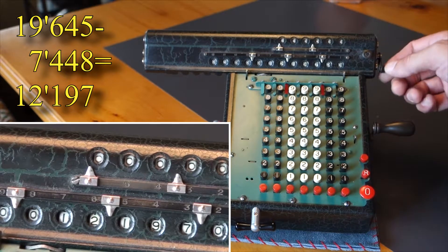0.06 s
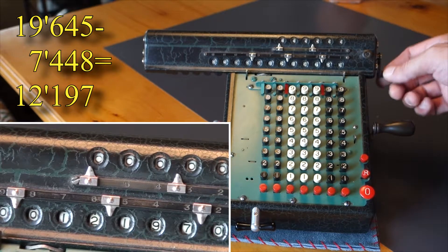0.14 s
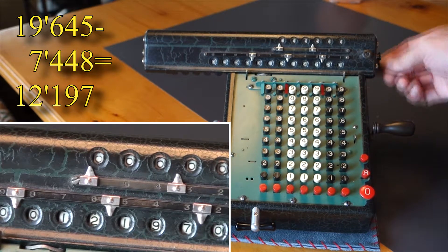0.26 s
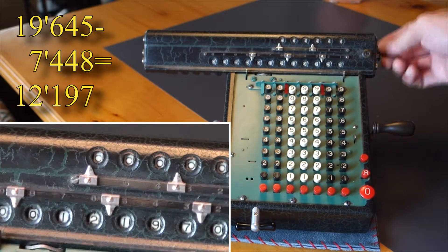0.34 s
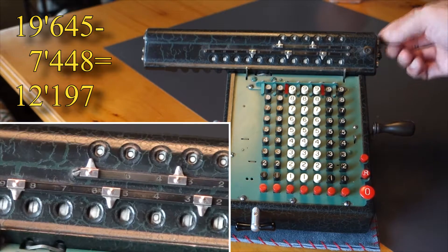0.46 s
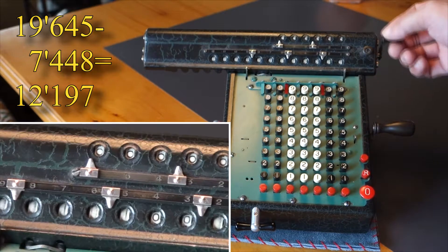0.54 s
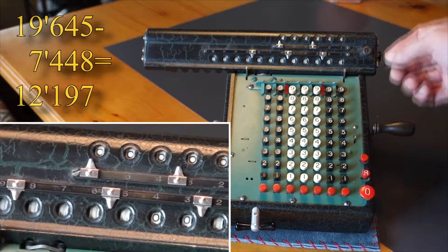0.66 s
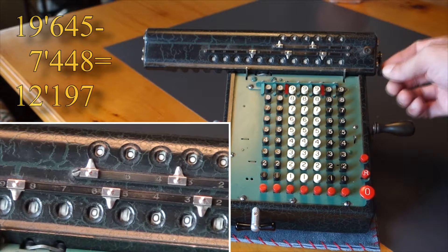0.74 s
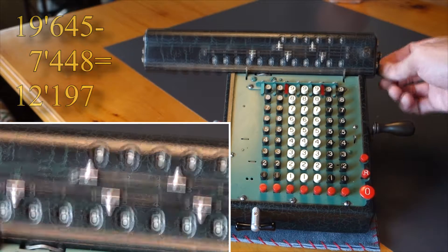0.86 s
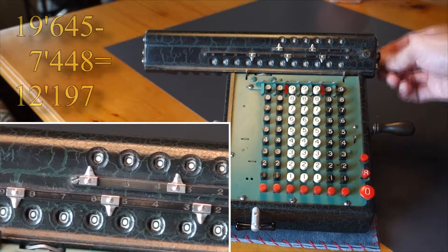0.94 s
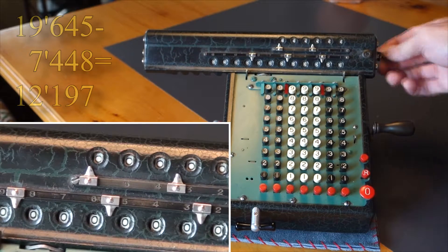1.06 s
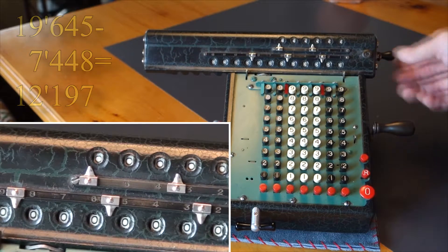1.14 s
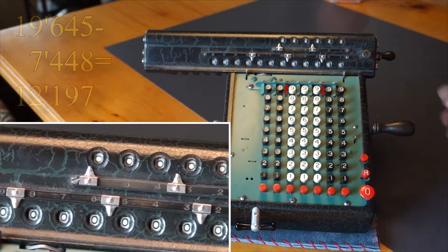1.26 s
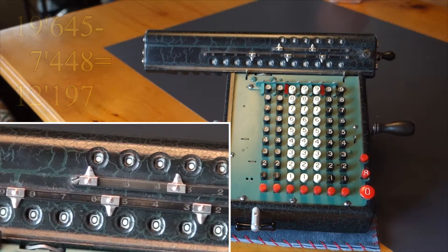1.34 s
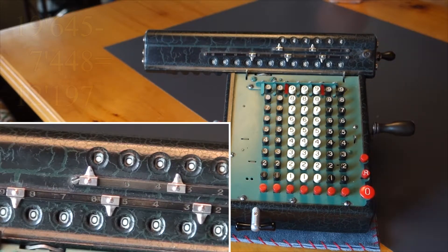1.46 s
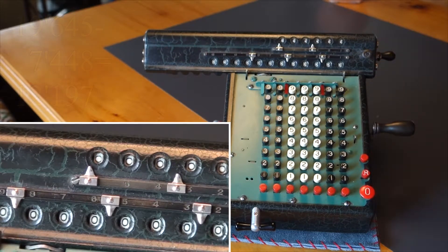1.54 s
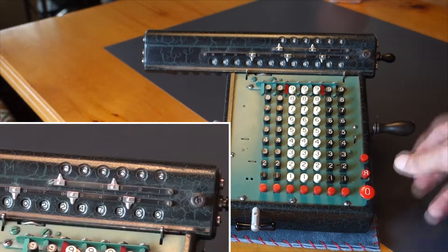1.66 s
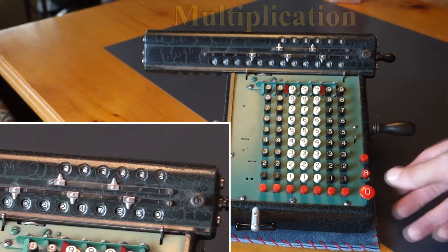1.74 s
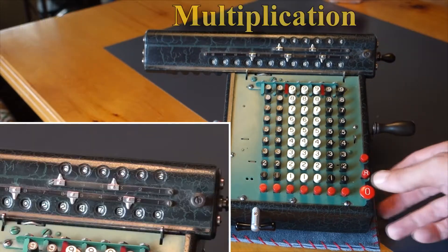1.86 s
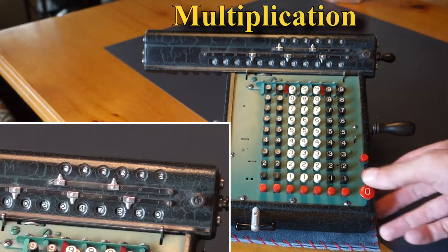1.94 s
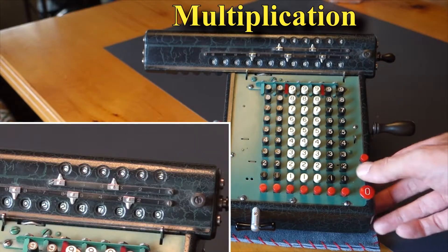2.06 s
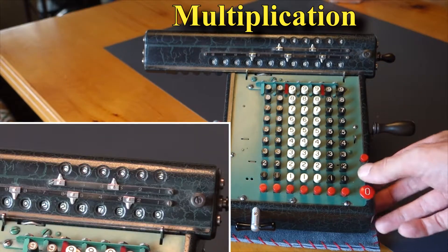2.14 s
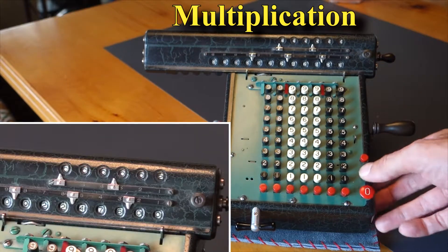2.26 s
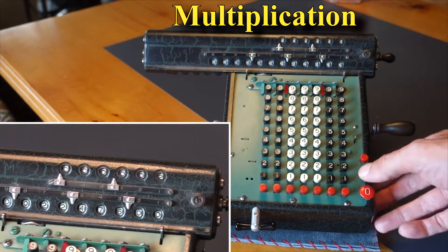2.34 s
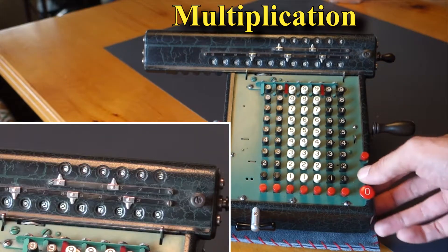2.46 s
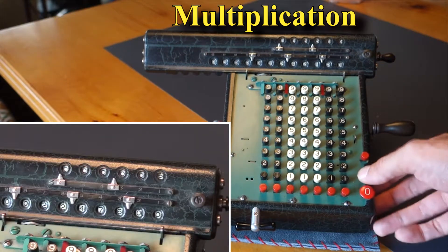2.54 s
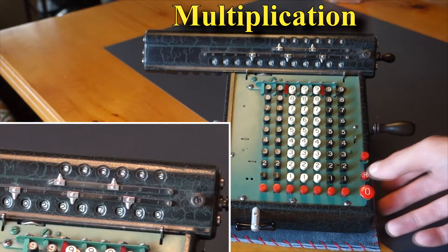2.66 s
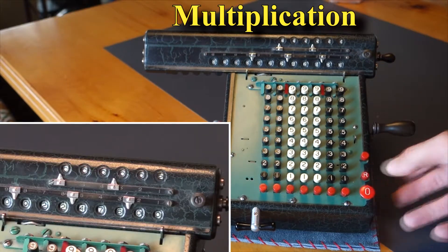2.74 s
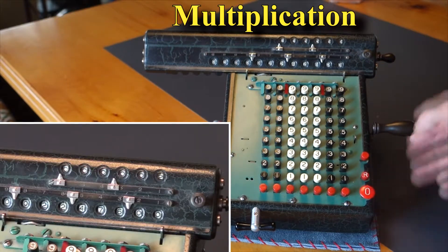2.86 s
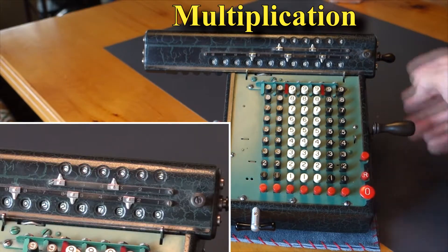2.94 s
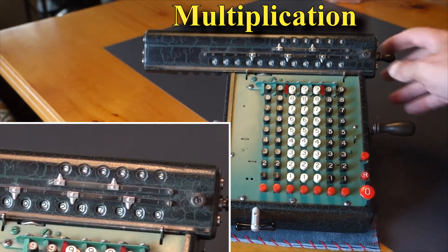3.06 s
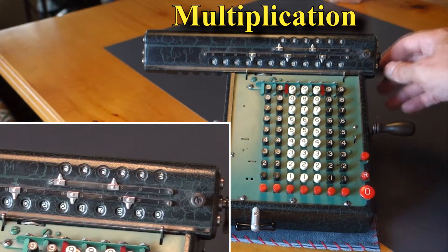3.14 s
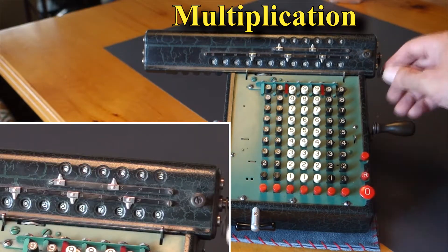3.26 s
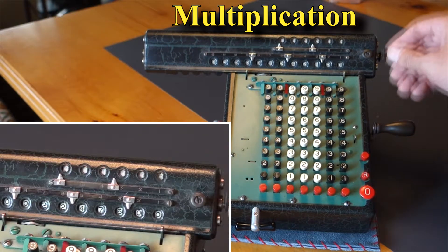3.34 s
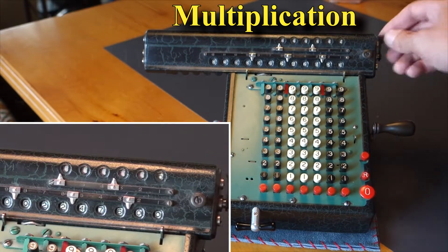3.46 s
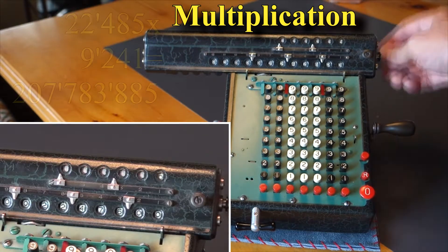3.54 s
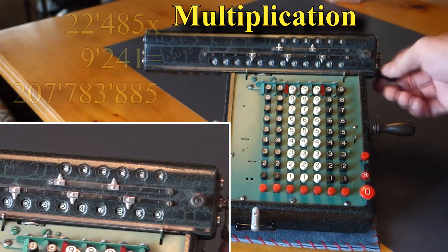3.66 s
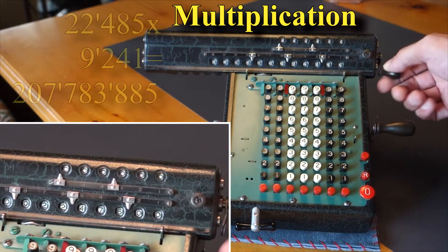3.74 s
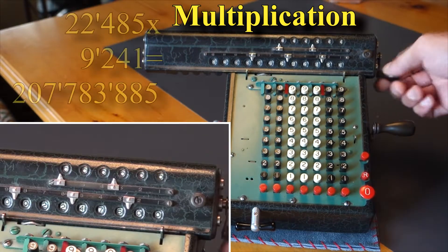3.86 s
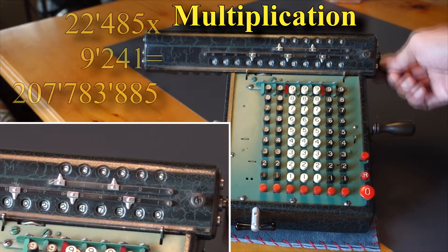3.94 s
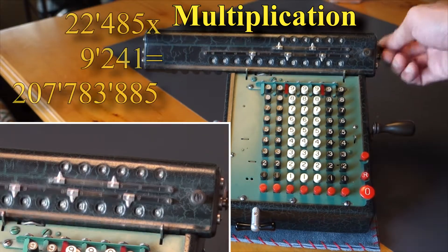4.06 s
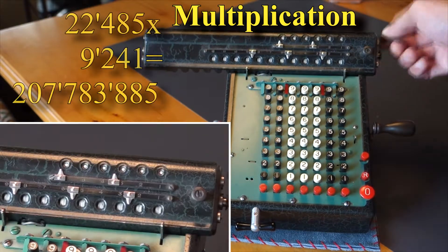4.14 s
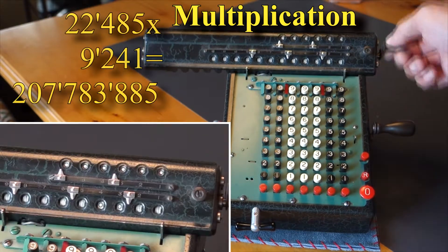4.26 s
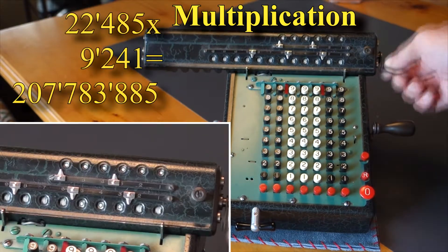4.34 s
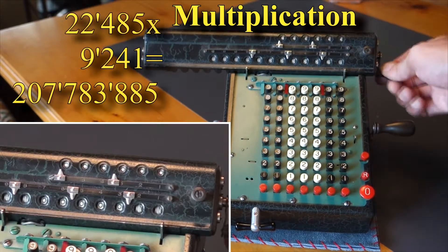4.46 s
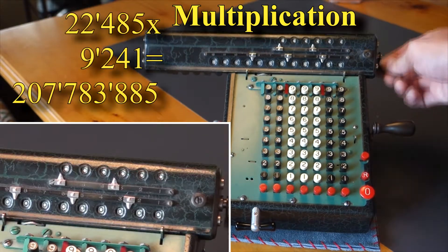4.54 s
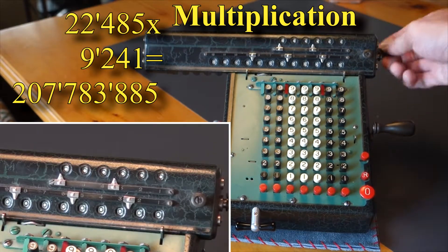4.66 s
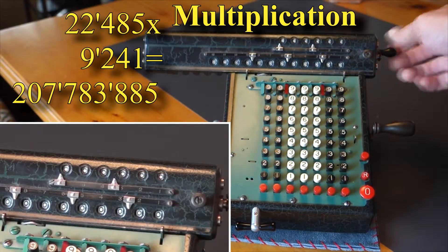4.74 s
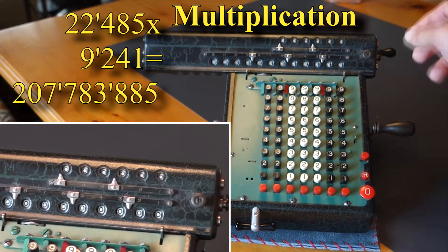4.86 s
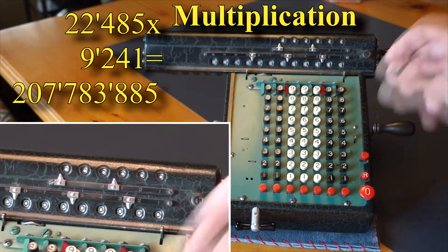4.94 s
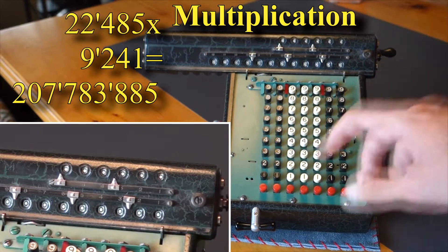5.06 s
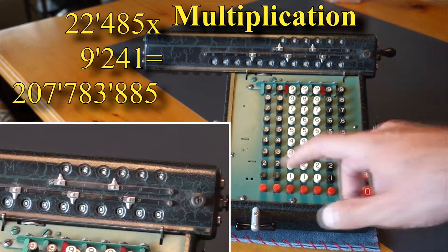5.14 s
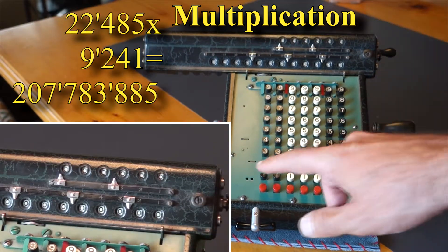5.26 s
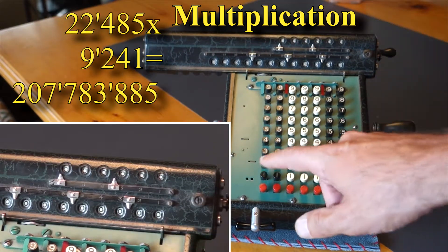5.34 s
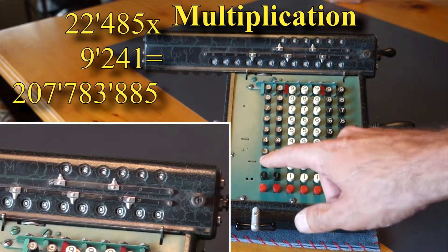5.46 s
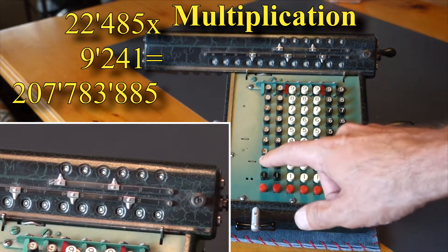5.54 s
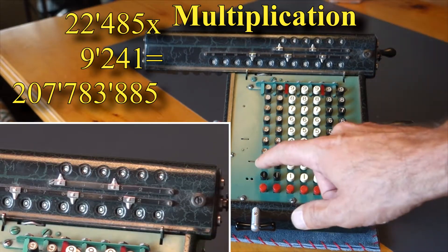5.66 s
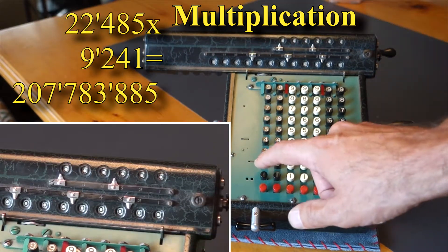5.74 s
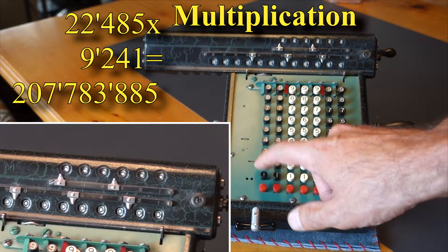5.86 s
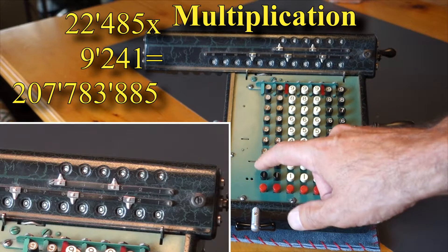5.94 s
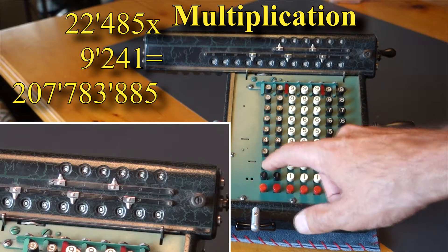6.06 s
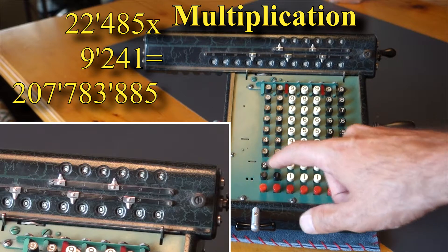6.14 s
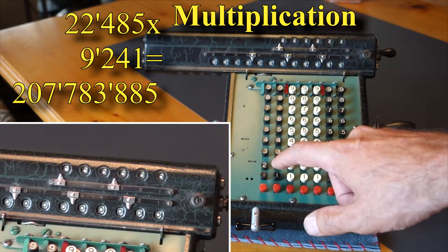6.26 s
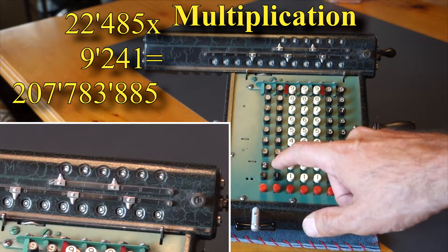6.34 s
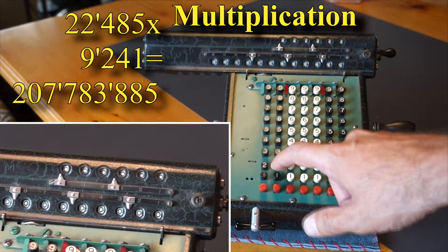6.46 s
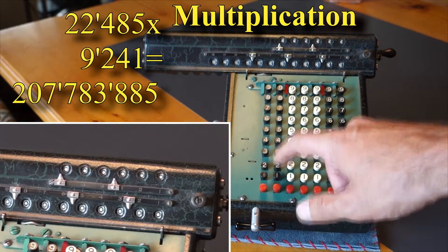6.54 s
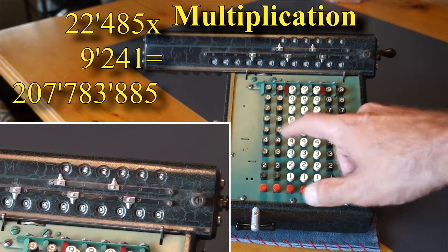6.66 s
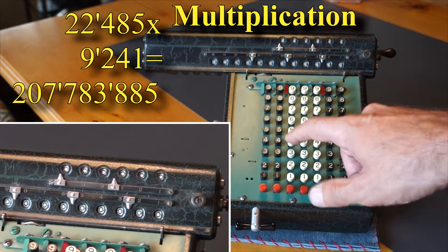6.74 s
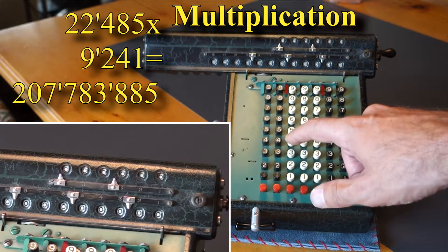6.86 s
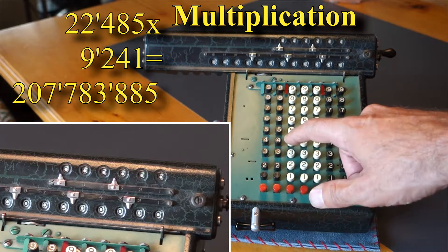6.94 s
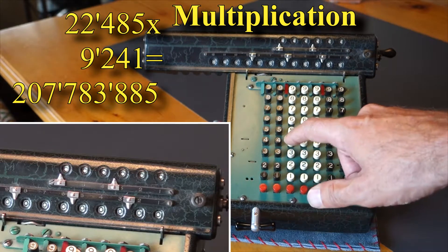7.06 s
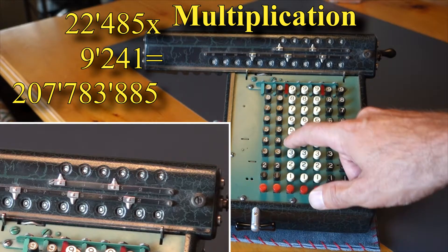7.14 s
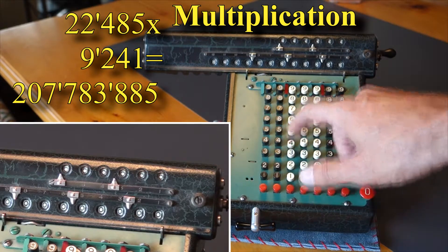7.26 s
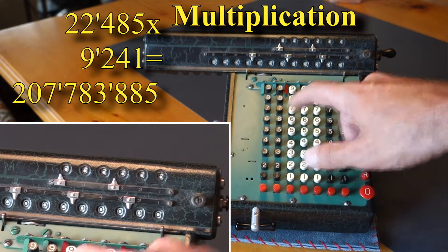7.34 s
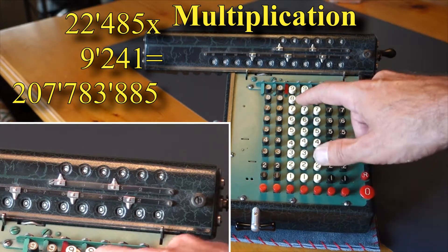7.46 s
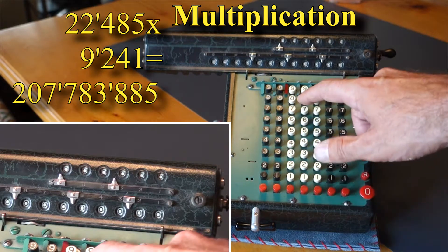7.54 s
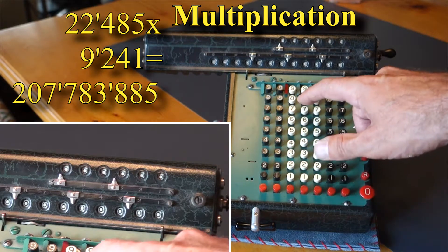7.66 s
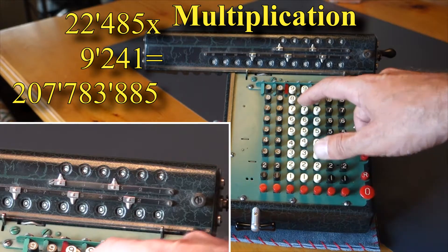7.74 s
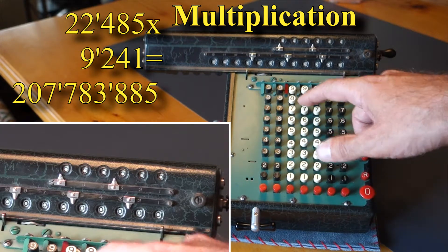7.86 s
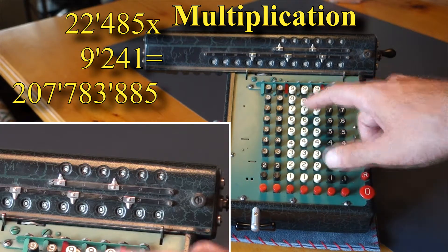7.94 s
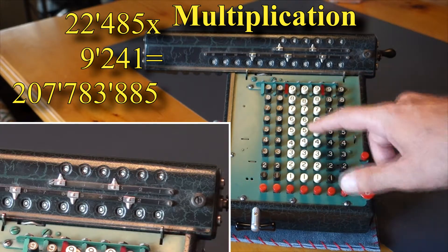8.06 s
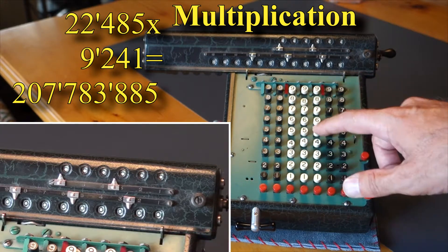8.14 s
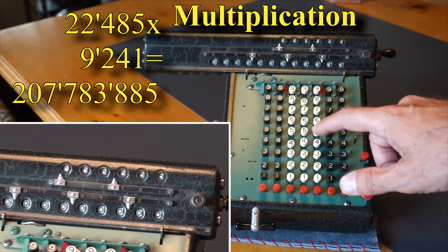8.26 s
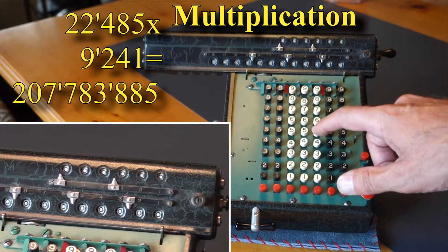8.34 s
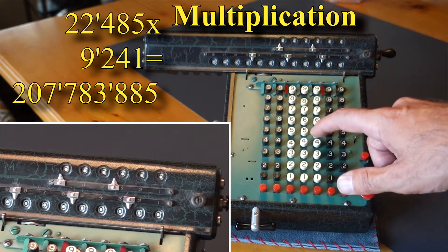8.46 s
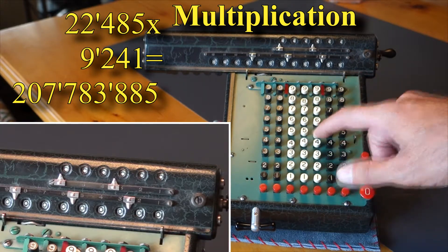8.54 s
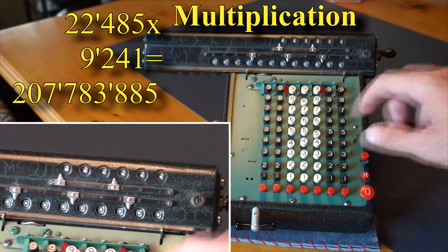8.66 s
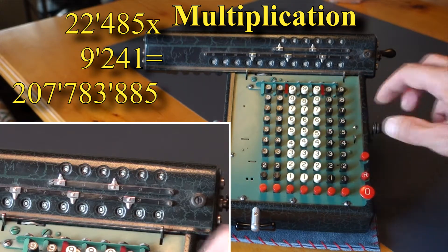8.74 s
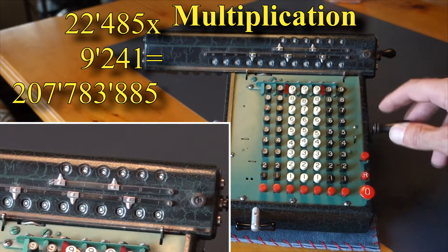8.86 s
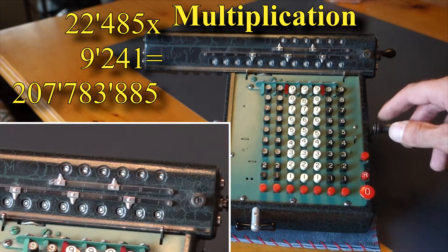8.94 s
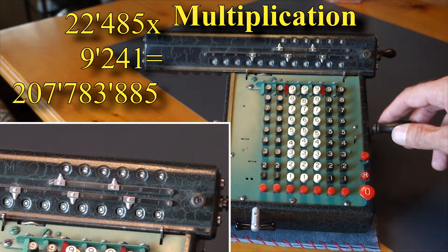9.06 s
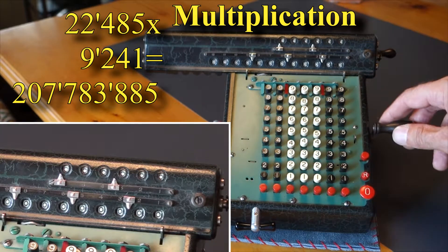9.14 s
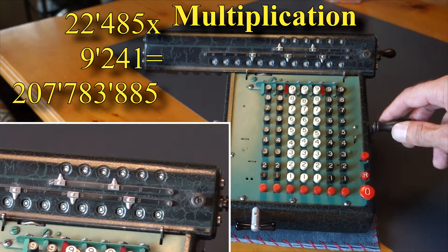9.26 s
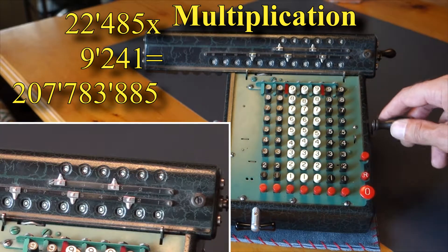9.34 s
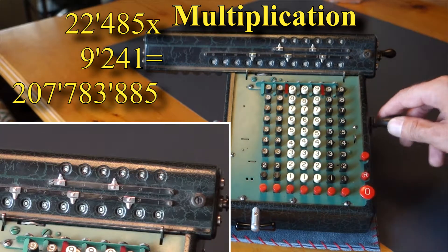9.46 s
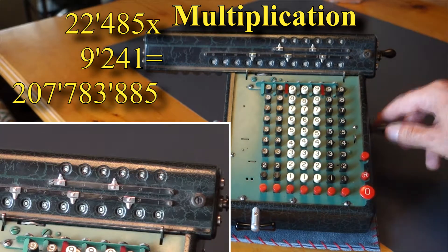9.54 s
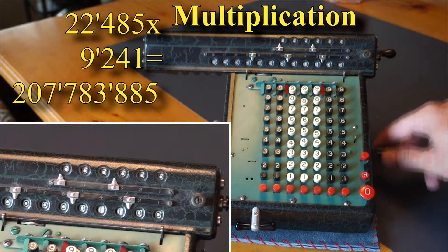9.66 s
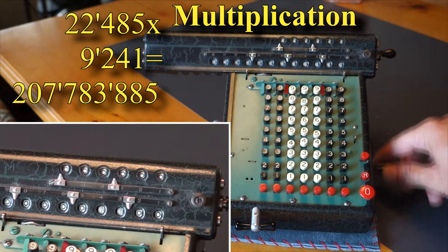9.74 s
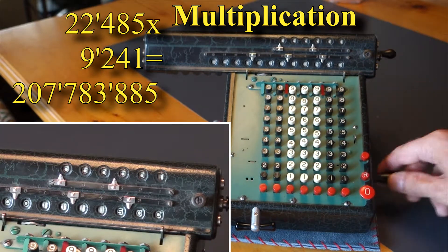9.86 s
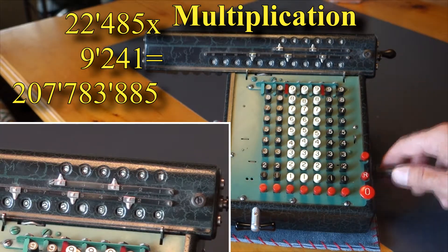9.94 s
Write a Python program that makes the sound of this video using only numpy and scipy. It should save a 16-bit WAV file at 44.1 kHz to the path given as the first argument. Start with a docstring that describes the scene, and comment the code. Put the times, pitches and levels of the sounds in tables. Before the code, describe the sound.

A quiet furnished room with soft air noise, microphone hiss, a barely audible low hum and a very thin high whine. A hand-cranked steel calculator sits on a wooden table, heard close. Faint ticks from 0.2 s grow into a clattering run of wheels from 0.4 s, ending in a loud, hard double clank at about 0.9 s with a short ringing tail. Quiet follows until a key taps and snaps at 2.45 s. Small ticks from 3.1 s lead to a knock and a rapid ratchet zip, 3.35 to 3.7 s. At 4.1 s a lever clicks, wheels rattle quickly from 4.25 s, and a heavy clack lands near 4.57 s. Single crisp key latches come at 5.9, 6.5, 7.2, 7.8 and 8.5 s, mostly preceded by faint finger touches. From 9.26 s the main crank's duller gear ticks start, becoming denser and stronger over rubbing until the end at 10 s.

```python
"""A quiet furnished room, with a hand-cranked steel calculator on a wooden table.
The clearing crank spins the dials back with a clatter and hits its stop, a pawl buzzes over a toothed rack,
keys latch one by one, then the main crank starts to turn. Blows and rubbing are showers of tiny metal contacts
coloured by ringing steel and wood; the pawl is a run of pings. Shaped noise gives the room's murmur and
microphone hiss, with a faint hum and a thin high whine as sines."""
import sys
import numpy as np
from scipy import signal
from scipy.fft import rfft, irfft, next_fast_len
from scipy.io import wavfile

SR = 44100
rng = np.random.default_rng(int(sys.argv[2]) if len(sys.argv) > 2 else 0)


def transcribe(u):
    """Save the signal u as a 16-bit wav file named by the first command-line argument.

    u: samples, shape (n,) or (channels, n), limited to [-1, 1]; the rate is SR.
    q: integer samples, one column per channel.
    """
    v = np.clip(np.atleast_2d(u).T, -1, 1)
    q = np.round(v * 32767).astype(np.int16)
    wavfile.write(sys.argv[1], SR, q)


N = 440559   # length in samples

# Room air and microphone hiss, spectrum shape: freq_hz, level_db (relative, per Hz)
MURMUR_SPECTRUM = [(15, -59), (25, -39), (49, -14), (147, -8.5), (178, -3), (209, -7.5), (304, -6),
                   (339, -7), (823, -5), (2050, -9), (2410, -9.5), (3910, -15), (4600, -15.5),
                   (10600, -21.5), (15400, -19.5)]
# How alike the murmur is on both sides: freq_hz, likeness (-1 to 1)
MURMUR_LIKENESS = [(60, 0.68), (180, 0.28), (550, 0.66), (1650, 0.55), (4970, 0.25), (15000, 0.1)]
# Side balance of the murmur: freq_hz, left_minus_right_db
MURMUR_TILT = [(60, -17.5), (180, -4.5), (550, 3.5), (1650, 2), (4970, 1.0), (15000, -4)]
# Drifting faint hum, before its side balance: time_s, pitch_hz, level_db
HUM_DRIFT = [(0, 181, -93), (2, 181.1, -76), (9.99, 180.3, -73)]
# Thin steady whine near the top: pitch_hz, level_db
WHINE_TONES = [(15600, -83), (15625, -77.5), (15650, -88)]
MURMUR_DB = -58.5

# Decay of the room's tail: freq_hz, t60_s
ROOM_DECAY = [(100, 0.41), (260, 0.45), (700, 0.52), (1840, 0.46), (4850, 0.34), (12800, 0.27)]
# Side balance of the machine and its room sound: freq_hz, left_minus_right_db
PORT_TILT = [(60, -5), (200, -18), (500, -2), (2000, -0.5), (4000, -5), (8000, -5), (14000, -2.5)]

# Table top modes, before a common boost: pitch_hz, width_hz, level_db
TABLE_MODES = [(46.4, 5, -13.5), (133.8, 14, 6), (190, 34, -3.5), (249, 56, -1.5)]
# Frame modes, before a common trim: pitch_hz, width_hz, level_db
FRAME_MODES = [(619, 56, 11.5), (864, 130, 7), (1191, 34, 17.5), (1666, 51, 12.5), (1898, 120, -1.5),
               (2070, 37, 7.5), (2370, 64.5, 9.5), (2537, 110, 3), (2720, 44, 1.5), (3720, 55, 4.5),
               (4510, 92, -4), (4670, 53, -1), (5640, 48, -17), (7100, 49, -11), (8150, 100, 1.5),
               (9650, 140, 11.5), (11100, 51, -1.5)]
# Pawl and rack modes, before common widening and boost: pitch_hz, width_hz, level_db
PAWL_MODES = [(690, 92, -6), (1200, 9.9, 2.5), (1680, 71, -8), (2550, 160, -4), (2870, 25, -9),
              (4350, 66, 3.5), (4860, 80, -2), (4980, 28, -5), (5960, 130, -7), (6830, 240, -3.5),
              (8600, 140, -8), (9050, 140, -11), (9700, 120, -13), (11560, 40, -1), (13400, 74, -20)]
# Overall colour of the steel machine: freq_hz, gain_db
STEEL_COLOUR = [(120, -19), (250, 3), (450, 4), (750, 3.5), (1200, 1), (2200, 4.5), (4000, 3), (8000, 5.5),
                (12000, 4.5), (16000, 4)]
# Extra colour of the key stems: freq_hz, gain_db
KEY_STEM_COLOUR = [(300, -10.5), (800, -3), (1500, -0.5), (2300, -4.5), (3400, -3), (6000, -2.5),
                   (12000, 0.5)]

# Levels from here on are drive levels, before the bodies and the room colour them.
# Shafts and wheels rubbing while a crank turns, one list per span: time_s, level_db
RUBBING_SPANS = [
    [(0.36, -66), (0.548, -53), (0.66, -69), (0.92, -55)],
    [(3.33, -61), (3.394, -46), (3.542, -38), (3.676, -45), (3.72, -77)],
    [(4.05, -62), (4.536, -58), (4.58, -34)],
    [(9.6, -66), (9.712, -53.5), (9.99, -54)],
]
RUB_DULL_DB, RUB_BRIGHT_DB = -19, -2.5   # against the middle part

# The rack speeds up under the pawl: time_s, teeth_passed (count)
RACK_MOTION = [(3.3583, 0), (3.3704, 1), (3.461, 6), (3.5254, 10), (3.6054, 16), (3.6744, 21)]
# Strength of the tooth drops: time_s, level_db
DROP_STRENGTH = [(3.36, -30.5), (3.48, -19), (3.54, -27), (3.59, -16), (3.675, -48)]

# A finger lands on a key or its stem starts to slide: start_s, level_db, bright_db, ring_hz, fall_s
KEY_TOUCHES = [(2.4039, -46.5, -2, 2700, 0.011), (2.439, -32.5, 0, 2600, 0.011),
               (2.4784, -33, 0, 3090, 0.0074), (5.8845, -45, -4, 2090, 0.012), (5.905, -37, 3, 2510, 0.024),
               (6.4205, -44.5, 2, 2150, 0.017), (6.4464, -36, -1, 2110, 0.027),
               (7.1297, -40, 2, 1610, 0.032), (7.477, -49.5, 7, 3960, 0.011),
               (7.671, -50.5, -17, 3180, 0.009), (7.7414, -47, -5, 2650, 0.02),
               (8.4385, -41.5, -2, 1640, 0.013), (8.465, -39, 5, 4000, 0.012)]
# A pressed key snaps into its latch:
# start_s, level_db, dull_db, bright_db, ring_hz, second_ring_hz, rise_s, fall_s
KEY_LATCHES = [(2.4509, -18, -16.5, 1.5, 3130, 11600, 0.007, 0.0067),
               (5.919, -27, -23, 1.5, 1870, 6060, 0.0074, 0.0087),
               (6.4608, -17.5, -23, -6.5, 3320, 2070, 0.0019, 0.0086),
               (7.1612, -20.5, -13.5, -0.5, 3440, 5000, 0.0012, 0.013),
               (7.773, -18.5, -33, -4, 2570, 1490, 0.0025, 0.0056),
               (8.473, -23.5, -26, -4.5, 3400, 5100, 0.0057, 0.0098)]
TOUCH_RISE_S, TOUCH_THUD_DB, TOUCH_DULL_DB, TOUCH_RING_DB = 0.0048, -34, -11, 0
LATCH_THUD_DB, LATCH_RING_DB = -41.0, -3.5

# Wheels and levers ticking as the clearing crank is handled or turned:
# time_s (the swell starts TICK_LEAD_S earlier), level_db, bright_db, ring_hz
WHEEL_TICKS = [(0.192, -51, 3, 1200), (0.273, -52, 4, 1250), (0.324, -45.5, -2, 1780),
               (0.368, -35, -16, 1710), (0.46, -29, -15, 2550), (0.482, -29.5, -2, 2400),
               (0.531, -36, 0, 1800), (0.575, -29.5, 1.5, 2630), (0.617, -30, 1.5, 2240),
               (0.655, -30.5, 2.5, 2930), (0.690, -32, 2.5, 1830), (0.732, -28, 0.5, 2600),
               (0.776, -33.5, 2, 2850), (0.827, -31.5, 2.5, 1840), (0.888, -23, -15, 2180),
               (3.134, -52, 1, 2550), (3.164, -57, 8, 2330), (3.201, -48.5, -2, 2830),
               (3.264, -57, 8, 1220), (3.347, -35.5, 0, 1200), (4.039, -42.5, -17, 1930),
               (4.142, -29, -4, 2550), (4.155, -22.5, -5.5, 1880), (4.242, -40, -4, 2060),
               (4.277, -36.5, 3, 2900), (4.290, -38, -13, 1680), (4.320, -27.5, 0.5, 2060),
               (4.351, -27.5, 2, 2440), (4.378, -28, -1, 2140), (4.411, -29.5, 1, 3060),
               (4.472, -28, 2, 2110), (4.539, -27, -3, 2020)]
# Heavier gears of the main crank mesh in longer, duller ticks: start_s, level_db, bright_db, ring_hz
CRANK_GEARS = [(9.260, -43.5, -5, 3530), (9.285, -36.5, -25, 2650), (9.365, -45, 13, 3540),
               (9.417, -42.5, -0.5, 3060), (9.529, -48, -12, 3140), (9.561, -46, -16, 1620),
               (9.656, -34.5, -1, 1730), (9.681, -41, 9, 1690), (9.721, -37, 4, 2870),
               (9.761, -36.5, 3, 1620), (9.796, -36, 1, 1670), (9.839, -34, 6.5, 2900),
               (9.854, -32, -6, 1610), (9.886, -31, 2.5, 1670), (9.930, -30.5, 5.5, 2750),
               (9.968, -35, 6, 2580)]
# The clearing crank engages, trips a lever or meets its stop:
# start_s, level_db, thud_db, dull_db, bright_db, ring_hz, left_minus_right_db, rise_s
CRANK_KNOCKS = [(0.3808, -22, -37, -33, -12, 1930, -0.5, 0.007),
                (0.8815, -26.5, -36, -18, 8.5, 2050, -1, 0.002),
                (0.9108, -10, -34, -17, -11, 2460, 11.5, 0.0022),
                (0.915, -5, -27.5, -8.5, 2, 1960, -4, 0.0064),
                (3.3175, -29.5, -37, -30, -14, 2320, -2, 0.002),
                (3.3567, -24.5, -32.5, -16, -4, 2260, 1, 0.0127),
                (4.0706, -20, -45, -20, -7.5, 2100, 0.5, 0.0069),
                (4.533, -20.5, -30, -21, 0, 2000, 1, 0.0032),
                (4.5696, -7, -30.5, -12, -2, 1660, -1.5, 0.013)]
TICK_LEAD_S, TICK_RISE_S, TICK_FALL_S = 0.004, 0.013, 0.0076
TICK_THUD_DB, TICK_DULL_DB, TICK_RING_DB = -34.5, -17.5, 3.5
CRANK_RISE_S, CRANK_FALL_S = 0.0074, 0.019
CRANK_THUD_DB, CRANK_DULL_DB, CRANK_RING_DB = -27.5, -13.0, 3
KNOCK_FALL_S, KNOCK_RING_DB, KNOCK_HIGH_HZ = 0.0056, -6.5, 5380

# Some small part rings along with each light blow, in this range: lowest_hz, highest_hz
HIGH_RING_RANGE = (4300, 7450)
SCATTER_DB, MACHINE_PAN_DB, PAN_SCATTER_DB = 3.5, -0.3, 1.5   # no two light blows are alike
CUTOFF_HZ = 15700


def amp(db):
    """dB to gain."""
    return 10 ** (np.asarray(db) / 20)


def rms_one(x):
    """Scale to rms 1."""
    return x / np.sqrt(np.mean(x ** 2) + 1e-20)


def at_hz(points, hz):
    """Read a (freq_hz, value) table on a log frequency axis."""
    points_hz, values = np.transpose(points)
    return np.interp(np.log(hz + 1), np.log(points_hz), values)


def coloured(x, gain_of_hz):
    """Filter by a smooth gain over frequency."""
    size = next_fast_len(x.shape[-1])
    spectrum = rfft(x, size) * gain_of_hz(np.fft.rfftfreq(size, 1 / SR))
    return irfft(spectrum, size)[..., :x.shape[-1]]


def side_balance(pair, points):
    """Give each side half of the left-right level difference at every frequency."""
    return coloured(pair, lambda hz: amp(np.outer([.5, -.5], at_hz(points, hz))))


def resonance(x, hz, width):
    """One ringing mode: a two-pole peak of gain 1."""
    r = np.exp(-np.pi * width / SR)
    zeros = np.array([1, 0, -1]) * (1 - r * r) / 2
    poles = [1, -2 * r * np.cos(2 * np.pi * hz / SR), r * r]
    return signal.lfilter(zeros, poles, x + 1e-18)


def body(x, modes, widen, modes_db):
    """Broad radiation with the modes standing out of it."""
    return x + sum(amp(db + modes_db) * resonance(x, hz, widen * width) for hz, width, db in modes)


def contacts(per_s, uneven_db):
    """Random tiny metal contacts of uneven size, as dull, middle and bright parts, each of rms 1."""
    struck = rng.random(N) < per_s / SR
    sizes = struck * amp(uneven_db * np.minimum(rng.exponential(1, N), 3))
    parts = []
    for hz, kind in [([300, 1200], "band"), ([1200, 5000], "band"), (5000, "high")]:
        band = signal.butter(2, hz, kind, fs=SR, output="sos")
        parts.append(rms_one(signal.sosfilt(band, sizes * rng.choice([-1, 1], N))))
    return np.array(parts)


def murmur():
    """Steady room air and microphone hiss, partly alike on both sides, with a faint hum and whine."""
    def share_gain(hz, sign):
        likeness = np.clip(at_hz(MURMUR_LIKENESS, hz), -1, 1)
        return amp(at_hz(MURMUR_SPECTRUM, hz)) * np.sqrt(1 + sign * likeness)

    mid, side = rng.standard_normal((2, N))
    mid = coloured(mid, lambda hz: share_gain(hz, 1))
    side = coloured(side, lambda hz: share_gain(hz, -1))
    pair = np.array([mid + side, mid - side]) / np.sqrt(np.mean(mid ** 2))
    pair = side_balance(pair, MURMUR_TILT)

    t = np.arange(N) / SR
    s, hz, db = np.transpose(HUM_DRIFT)
    hum_phase = 2 * np.pi * np.cumsum(np.interp(t, s, hz)) / SR
    hum = np.sqrt(2) * amp(np.interp(t, s, db)) * np.sin(hum_phase)
    whine = sum(np.sqrt(2) * amp(db) * np.sin(2 * np.pi * (hz * t + rng.random()))
                for hz, db in WHINE_TONES)
    return amp(MURMUR_DB) * pair + hum * amp([[-2.0], [1.5]]) + whine


def room(x, wet_db):
    """Each side hears its own diffuse tail, dying band by band."""
    t, tail = np.arange(SR) / SR, 0
    edges = 70 * 2 ** np.arange(0, 8.1, .5)   # half-octave bands
    white = rng.standard_normal((2, 2, SR))
    for k, (low, high) in enumerate(zip(edges, edges[1:])):
        sos = signal.butter(2, [low, high], "band", fs=SR, output="sos")
        band = signal.sosfilt(sos, white[k % 2])   # neighbouring bands use separate noise
        t60 = np.clip(at_hz(ROOM_DECAY, np.sqrt(low * high)), .05, 1.5)
        tail = tail + band * amp(-60 * t / t60)
    alike = 0.23   # walls near the microphone send both sides much the same echoes
    tail = (tail + alike * tail[::-1]) * np.minimum(t / 0.00067, 1)
    tail = tail / np.sqrt(np.sum(tail ** 2) / 2)
    return amp(wet_db) * signal.fftconvolve(x, tail, axes=1)[:, :N]


def table_top(push):
    """The wooden table booms in its few low modes when it is pushed."""
    return sum(amp(db + 6.5) * resonance(resonance(push, hz, 2.4 * width), hz, width)
               for hz, width, db in TABLE_MODES)


def shaken_table(rub):
    """Turning shakes the table top in its second mode."""
    hz = TABLE_MODES[1][0]
    return amp(27.5) * resonance(resonance(rub, hz, 30.0), hz, 29.0)


def along(spans):
    """Level over time, silent between the spans."""
    t = np.arange(N) / SR
    return sum(amp(np.interp(t, *np.transpose(rows), left=-200, right=-200)) for rows in spans)


def rubbing():
    """Dense contacts that follow the turning effort."""
    return along(RUBBING_SPANS) * (amp([RUB_DULL_DB, 0, RUB_BRIGHT_DB]) @ contacts(6000, 2.3))


def tooth_drops():
    """The pawl drops each time one more tooth has passed."""
    s, teeth = np.transpose(RACK_MOTION)
    s = np.interp(np.arange(teeth[-1] + 1), teeth, s)
    return s, np.interp(s, *np.transpose(DROP_STRENGTH)) + rng.normal(0, 1.5, len(s))


def ratchet(rub):
    """Each tooth drop is a short ping with a weaker rebound; pawl and rack ring on in a burst after it."""
    drops, rebounds = np.zeros((2, N))
    s, db = tooth_drops()
    drops[np.round(s * SR).astype(int)] = amp(db)
    rebound_db = db - 11.5 + rng.normal(0, 3.8, len(s))
    rebounds[np.round((s + .0038) * SR).astype(int)] = amp(rebound_db)
    ping = amp(36.0) * resonance(resonance(drops + rebounds, 2610, 400), 2340, 480)
    rack = amp(35.0) * resonance(resonance(rebounds, 4200, 400), 4200, 600)
    shaken = signal.lfilter([1], [1, -np.exp(-1 / (0.007 * SR))], drops > 0)   # dies over 7 ms
    chatter = rub * shaken
    modes_only = body(chatter, PAWL_MODES, widen=1.26, modes_db=15.5) - chatter
    return ping + rack + amp(4.0) * modes_only


def blows(rows, crest_db, high_db, ring_width, rattle_db, rattle_s, snap_db):
    """Showers of contacts that swell and die; the struck part rings and the table takes the push."""
    steel, push = np.zeros((2, N)), np.zeros(N)
    t = np.arange(SR // 3) / SR
    centre = contacts(12000, 3.5)
    spread = contacts(12000, 1.5) * [[.25], [.35], [.75]]
    grains = np.array([centre + spread, centre - spread])   # contacts lie along the whole carriage
    for s, db, thud_db, dull_db, bright_db, low_hz, low_db, high_hz, pan_db, rise, fall in rows:
        start = round(s * SR)
        at = slice(start, min(N, start + len(t)))
        rise, fall = max(rise, 2e-4), max(fall, 1e-3)
        after = np.maximum(t - rise, 0)
        swell = np.sin(np.pi / 2 * np.minimum(t / rise, 1)) ** 0.67
        blow = (swell * np.exp(-after / fall))[:at.stop - at.start]
        rattle = amp(rattle_db) * swell * np.exp(-after / rattle_s)   # loose wheels shake on
        rattle = rattle[:at.stop - at.start]

        shower = (blow + rattle) * (amp([dull_db, 0, bright_db]) @ grains[:, :, at])
        low_ring = amp(low_db) * resonance(shower, low_hz, ring_width)
        high_ring = amp(high_db) * resonance(shower, high_hz, 2.6 * ring_width)
        first = (np.arange(len(blow)) == 0) * amp(snap_db)   # the first contact is one hard snap
        snap = resonance(resonance(first, low_hz, 702.0), low_hz, 400.0) + amp(bright_db - 19.0) * first
        struck = shower + low_ring + high_ring + snap
        steel[:, at] += amp(db - crest_db) * struck * amp([[pan_db / 2], [-pan_db / 2]])
        push[at] += amp(db + thud_db) * np.gradient(blow) * rise * SR   # the table feels the change of force
    return steel, push


def light(rows, rise, thud_db, dull_db, ring_db):
    """Light blows share one shape; thud, dullness, ring and side scatter by chance."""
    full = []
    for s, db, bright_db, hz, fall in rows:
        thud, dull, ring, pan = rng.standard_normal(4)
        high_hz = np.exp(rng.uniform(*np.log(HIGH_RING_RANGE)))
        full.append((s, db, thud_db + SCATTER_DB * thud, dull_db + SCATTER_DB * dull, bright_db,
                     hz, ring_db + SCATTER_DB * ring, high_hz,
                     MACHINE_PAN_DB + PAN_SCATTER_DB * pan, rise, fall))
    return full


def key_blows():
    """Light finger touches and harder latch snaps as full blow descriptions."""
    touches = light(KEY_TOUCHES, TOUCH_RISE_S, TOUCH_THUD_DB, TOUCH_DULL_DB, TOUCH_RING_DB)
    latches = [(s, db, LATCH_THUD_DB, dull_db, bright_db, hz, LATCH_RING_DB, high_hz,
                MACHINE_PAN_DB, rise, fall)
               for s, db, dull_db, bright_db, hz, high_hz, rise, fall in KEY_LATCHES]
    return touches + latches


def wheel_blows():
    """Wheel ticks, gear ticks and heavy crank knocks as full blow descriptions."""
    ticks = light([(s - TICK_LEAD_S, *row, TICK_FALL_S) for s, *row in WHEEL_TICKS],
                  TICK_RISE_S, TICK_THUD_DB, TICK_DULL_DB, TICK_RING_DB)
    gears = light([(*row, CRANK_FALL_S) for row in CRANK_GEARS],
                  CRANK_RISE_S, CRANK_THUD_DB, CRANK_DULL_DB, CRANK_RING_DB)
    knocks = [(s, db, thud_db, dull_db, bright_db, hz, KNOCK_RING_DB, KNOCK_HIGH_HZ,
               pan_db, rise, KNOCK_FALL_S)
              for s, db, thud_db, dull_db, bright_db, hz, pan_db, rise in CRANK_KNOCKS]
    return ticks + gears + knocks


def scene():
    """Steel parts through the frame, pushes through the table, all into the room."""
    rub = rubbing()
    keys, key_push = blows(key_blows(), crest_db=13.5, high_db=-8.0, ring_width=220,
                           rattle_db=-13, rattle_s=0.057, snap_db=37.5)
    keys = coloured(keys, lambda hz: amp(at_hz(KEY_STEM_COLOUR, hz)))
    wheels, wheel_push = blows(wheel_blows(), crest_db=17.0, high_db=-6.5, ring_width=170,
                               rattle_db=-18.0, rattle_s=0.06, snap_db=33.5)
    frame = body(wheels + amp(-2.0) * rub, FRAME_MODES, widen=1.0, modes_db=-10.0)
    steel = frame + keys + amp(-6.5) * ratchet(rub)
    machine = coloured(steel, lambda hz: amp(at_hz(STEEL_COLOUR, hz))) + shaken_table(rub)
    table = table_top(wheel_push + key_push)
    heard = machine + table + room(machine + amp(-1.0) * table, wet_db=-5.5)
    return side_balance(heard, PORT_TILT) + murmur()


def record(dry):
    """The loudest peaks are rounded, the top is cut steeply."""
    rounded = 0.62 * np.tanh(dry / 0.62)
    return signal.sosfilt(signal.ellip(12, .3, 75, CUTOFF_HZ, fs=SR, output="sos"), rounded)


dry = scene()
out = record(dry)
transcribe(out)
```